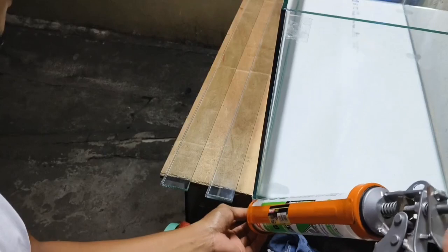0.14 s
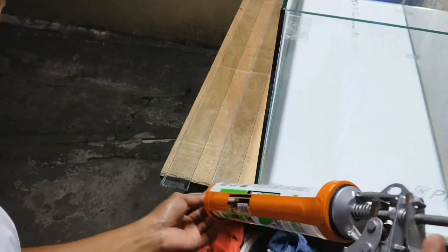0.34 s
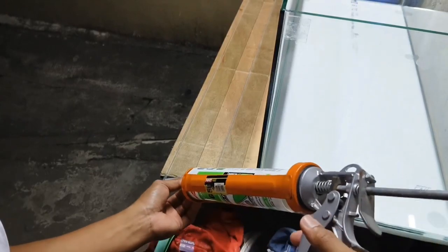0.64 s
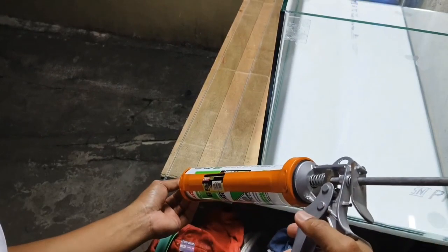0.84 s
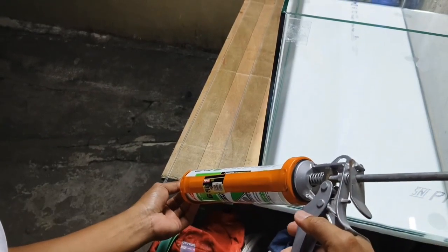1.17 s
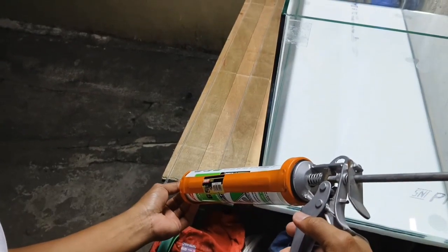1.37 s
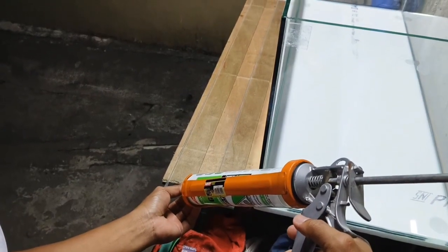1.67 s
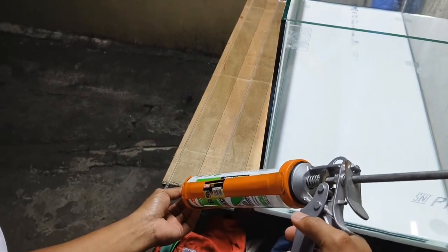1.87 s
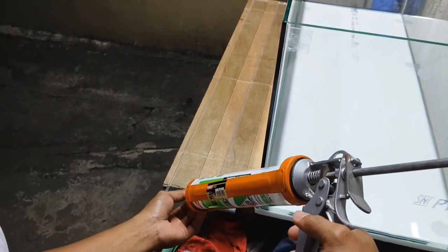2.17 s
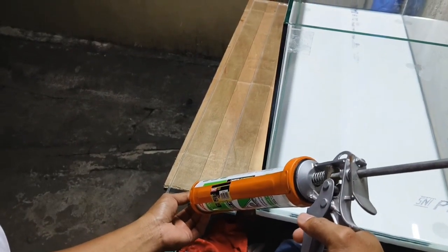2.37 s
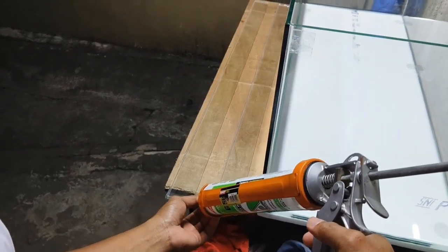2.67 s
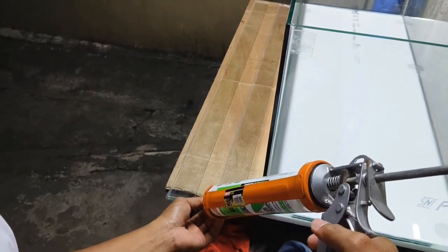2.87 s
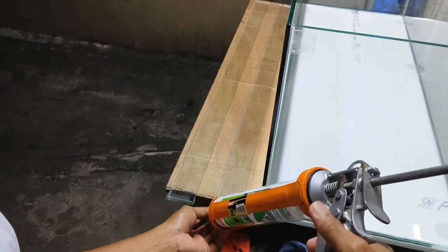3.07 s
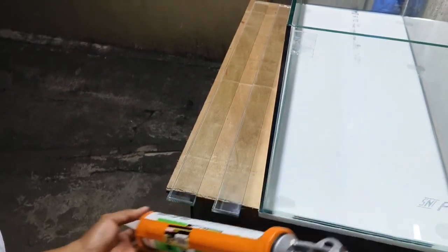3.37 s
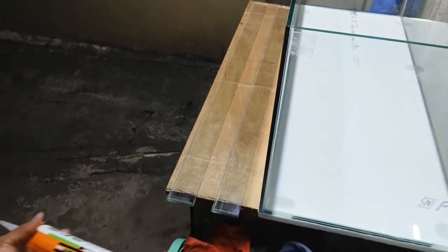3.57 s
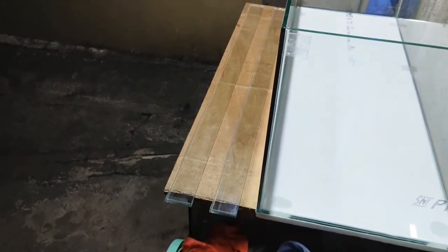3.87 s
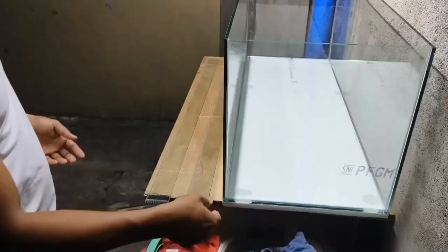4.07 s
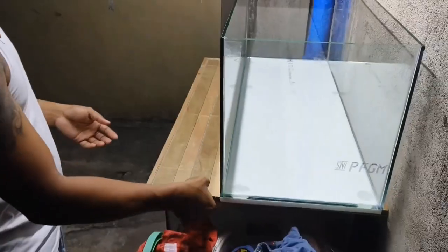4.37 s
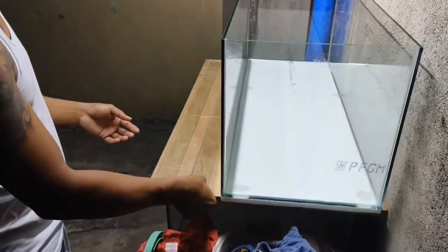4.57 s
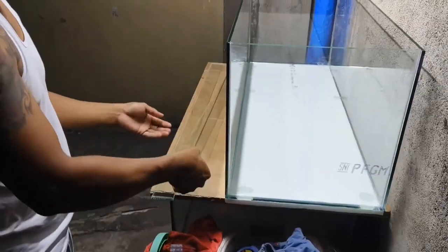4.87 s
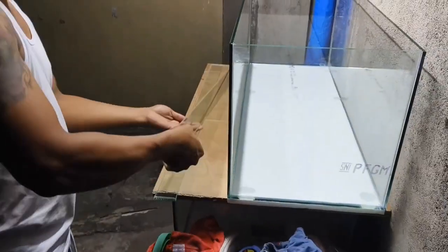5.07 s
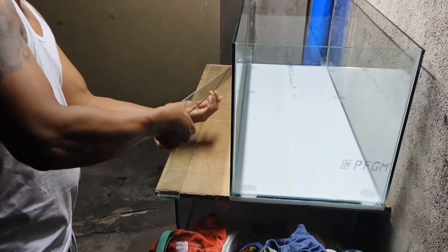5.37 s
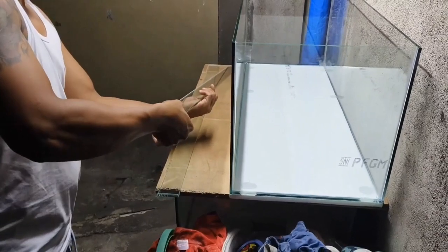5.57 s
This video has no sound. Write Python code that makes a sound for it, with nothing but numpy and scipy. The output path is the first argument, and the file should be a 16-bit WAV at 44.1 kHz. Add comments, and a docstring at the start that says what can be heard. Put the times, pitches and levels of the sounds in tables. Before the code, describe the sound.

Faint handling knocks lead to a hard double-edged metal snap with a short room ring. Small dry clicks and spring pings follow, separated by near quiet with faint rubbing and steady low hum. Another crisp snap, a brief clatter of putting down, then glass drags over wood with gritty scraping, low woody rumble and bright, damped clinks. Close microphone, short hard room reflections.

```python
"""In a small hard-walled workshop with a humming motor, a steel caulking gun is squeezed.
Its catch snaps, the spring and rod tick under load, the catch snaps free and the gun is put down.
Then a glass strip is slid off a wooden board and clinks against its neighbours.
Impacts are decaying clusters of modes, friction is a crowd of tiny ringing slips,
and the walls add a short noise-like tail."""
import sys
import numpy as np
from scipy import signal
from scipy.fft import rfft, irfft
from scipy.io import wavfile

SR = 44100
rng = np.random.default_rng(int(sys.argv[2]) if len(sys.argv) > 2 else 0)


def master_out(mix):
    """Clip the mix to full scale and print it as 16-bit PCM to the path in sys.argv[1]."""
    frames = np.transpose(np.atleast_2d(mix))
    ceiling = np.clip(frames, -1, 1)
    pcm = np.round(ceiling * 32767).astype(np.int16)
    wavfile.write(sys.argv[1], SR, pcm)


N = 252252   # samples

# Levels of events and curves are relative: each layer may add an offset of its own.
# catch snapping: (time [s], level [dB], treble [dB], left-right [dB], rattle t60 [s],
# rebound level [dB], room level [dB], room t60 [s])
SNAPS = [(0.2731, -9.5, -2.5, -2.5, 0.022, -0.5, -13, 0.17), (3.4094, -6, 3.5, -2, 0.012, -6, -13, 0.26)]
# spectrum of the glass strip: (frequency [Hz], level [dB per Hz])
GLASS = [(590, -98), (1000, -11), (1310, -43), (1710, -18.5), (2560, 1), (2940, -2.5), (3670, -8),
         (3980, -8), (7190, -6), (8260, -15), (9060, -10.5), (9830, -16), (12800, -12), (14900, -14.5),
         (16000, -26)]
# spectrum of the wooden board: (frequency [Hz], level [dB per Hz])
BOARD = [(220, -9), (320, -18), (410, 16), (520, -7), (800, -14.5), (1200, 0), (2000, -50)]
# phase by which the left microphone leads: (frequency [Hz], lead [rad])
LEAD = [(150, 0), (300, 1.4), (690, 2.8), (1500, 3.3), (3000, 5), (5000, 12.1), (16000, 38.8)]


def from_db(db):
    """Amplitude gain is ten to the power of a twentieth of the decibels."""
    return 10 ** (np.asarray(db) / 20)


def rms_one(x):
    """Normalise the mean power, so that the rms is 1."""
    return x / np.sqrt(np.mean(x ** 2) + 1e-20)


def at_hz(points, hz):
    """Interpolate a spectrum on a logarithmic frequency axis."""
    f, value = np.transpose(points)
    return np.interp(np.log(hz + 1), np.log(f), value)


def in_time(rows):
    """Interpolate each column of a time curve at every sample."""
    s, *columns = np.transpose(rows)
    return [np.interp(np.arange(N) / SR, s, c) for c in columns]


def drift(rate):
    """Random modulation: independent normal values, rate per second, joined by straight lines."""
    return np.interp(np.arange(N) / SR * rate, np.arange(4096), rng.standard_normal(4096))


def add(out, s, sound, pan_db=0):
    """Superpose a sound at a time, placed by the level difference between the microphones."""
    i = int(np.clip(s * SR, 0, out.shape[1] - 1))
    panned = sound * from_db([[pan_db / 2], [-pan_db / 2]])
    out[:, i:i + sound.shape[-1]] += panned[:, :out.shape[1] - i]


def coloured(white, db_at):
    """Spectral shaping and interchannel coherence: two unrelated signals become a pair of rms 1."""
    # correlation of the two microphones, limited below: (frequency [Hz], correlation [-])
    likeness = [(60, 8), (130, 0.9), (290, 3.5), (640, 0.61), (1400, 0.56), (3100, 0.35), (7000, 0.21)]
    # level difference of the microphones: (frequency [Hz], left-right [dB])
    balance = [(200, -2), (300, 12.5), (600, 0), (4500, 1), (6400, -8), (8200, -2.5), (10500, 9.5),
               (13000, 3)]
    hz = np.fft.rfftfreq(white.shape[1], 1 / SR)
    mid, side = rfft(white) * from_db(db_at(hz))
    alike = np.clip(at_hz(likeness, hz), -.99, .99)
    pair = np.sqrt(1 + alike) * mid + np.sqrt(1 - alike) * side * [[1], [-1]]
    pair[1] *= np.exp(-1j * np.interp(hz, *np.transpose(LEAD)))
    balanced = pair * from_db(at_hz(balance, hz) * np.array([[.5], [-.5]]))
    return rms_one(irfft(balanced, white.shape[1]))


def strike(db_at, t60, rise_s=0.0015, ripple_db=6.0, size=8192):
    """High modal density: a contact excites countless close modes unevenly; they decay together."""
    t = np.arange(size) / SR
    fade = from_db(-60 * t / max(t60, .004)) * (1 - np.exp(-t / rise_s))
    clusters = np.geomspace(1500, 16000, 60)
    favoured = ripple_db * rng.standard_normal(len(clusters))   # depends on the spot that is touched

    def rippled(hz):
        """Uneven excitation added to the mean spectrum."""
        return db_at(hz) + np.interp(hz, clusters, favoured)
    ring = coloured(rng.standard_normal((2, size)), rippled) * fade
    energy = np.mean(np.sum(ring ** 2, axis=1))
    return ring * np.sqrt(np.sum(fade ** 2) / energy)


def resonance(hz, centre_hz, q):
    """Response in dB of a single resonator of quality factor q."""
    ratio = (hz + 1) / centre_hz
    return -10 * np.log10(1 + (q * (ratio - 1 / ratio)) ** 2)


def treble(hz, edge_hz=8500):
    """Contact stiffness: a weight from 0 to 1 where a hard contact is brighter than a soft one."""
    return .5 + .5 * np.tanh((hz - edge_hz) / 1200)


def friction(spectrum, spread_db, cycles, count, size):
    """Micro-slip friction: uneven slips each ring one mode, which falls 60 dB in a few cycles."""
    when, pitch, strength, *phases = rng.random((5, count, 1))
    low_hz, high_hz = spectrum[0][0], spectrum[-1][0]
    hz = low_hz * (high_hz / low_hz) ** pitch
    gain = from_db(at_hz(spectrum, hz) - spread_db * np.log(strength + .03)) * hz
    turns = hz * np.arange(size) / SR
    fade = gain * np.exp(-np.log(1000) * turns / cycles) * np.minimum(turns, 1)
    at = ((when * N).astype(int) + np.arange(size)).ravel()
    channels = []
    for phase in phases:   # one set of phases for each microphone
        slips = fade * np.sin(2 * np.pi * (turns + phase))
        channels.append(np.bincount(at, slips.ravel(), N)[:N])
    return rms_one(np.array(channels))


def room(x, wet_db, t60=0.14, gap_s=0.0013, uneven_db=0.5, size=13230):
    """Reverberation: after a brief gap, wall echoes bunch up into a short, uneven decaying tail."""
    t = np.arange(size) / SR
    bunches = uneven_db * np.interp(t, np.linspace(0, t[-1], 120), rng.standard_normal(120))
    onset = np.clip(t / gap_s - .5, 0, 1)
    tail = rng.standard_normal((2, size)) * from_db(bunches - 60 * t / t60) * onset
    tail /= np.sqrt(np.sum(tail ** 2, axis=1, keepdims=True))
    return x + from_db(wet_db) * signal.oaconvolve(x, tail, axes=1)[:, :x.shape[1]]


def split_mode(hz, t, spread=.014, count=5):
    """Beating: loosely joined plates split a mode into close partners, unlike at each microphone."""
    jitter = rng.uniform(-1.05, 1, (count, 2, 1)) / count
    detune = np.linspace(-1, 1, count)[:, None, None] + jitter
    phase = rng.random(detune.shape)
    partners = np.sin(2 * np.pi * (hz * (1 + spread * detune) * t + phase)) / (1 + 2 * detune ** 2)
    return rms_one(np.sum(partners, axis=0)) / np.sqrt(2)


def one_mode(hz, t60, rise_s, size=4096):
    """A damped oscillator swells and dies; its phase lags at the right microphone."""
    t = np.arange(size) / SR
    lag = np.interp(hz, *np.transpose(LEAD)) * np.array([[0], [1]])
    return np.sin(2 * np.pi * hz * t - lag) * from_db(-60 * t / t60) * (1 - np.exp(-t / rise_s))


def workshop(waver_db=1.85, wander_rad=0.74, rumble_db=-56.0, air_db=-53.5, air_waver_db=1.87):
    """Tonal and broadband noise: a motor's wavering lines over low rumble and a wavering hiss."""
    # motor hum: (frequency [Hz], rms level before wavering [dB])
    hum_lines = [(60, -68), (120.2, -54), (149.2, -60), (241, -66.5), (360.7, -64), (480, -72.5),
                 (602, -72.5)]
    # spectrum of the rumble: (frequency [Hz], level [dB per Hz])
    rumble_spectrum = [(15, -51), (25, -25), (45, -32), (65, 3.5), (95, -0.5), (170, 3.5), (270, -8),
                       (450, -2), (750, -21), (1500, -34)]
    # spectrum of the hiss: (frequency [Hz], level [dB per Hz])
    air_spectrum = [(100, 1.5), (700, 6), (1200, 6), (2000, -3), (2800, 1), (3600, -5), (5500, -2.5),
                    (7200, 3), (8300, -21), (11000, -8), (15500, -5.5)]
    t = np.arange(N) / SR
    hum = 0
    for hz, db in hum_lines:
        gain = from_db(db + waver_db * drift(8.3)) * np.sqrt(2)
        hum = hum + gain * np.sin(2 * np.pi * (hz * t + rng.random()) + wander_rad * drift(4.3))
    rumble = coloured(rng.standard_normal((2, N)), lambda hz: at_hz(rumble_spectrum, hz))
    air = coloured(rng.standard_normal((2, N)), lambda hz: at_hz(air_spectrum, hz))
    return hum + from_db(rumble_db) * rumble + from_db(air_db + air_waver_db * drift(16)) * air


def rubbing(level_db=-5.5, waver_db=3, wavers_per_s=12.1):
    """Sliding friction: fine, wavering crackle of the rod creeping through its guide."""
    # rod and hand rubbing on the gun: (time [s], level [dB])
    rub_curve = [(0.0, -56), (0.33, -52.5), (0.46, -63), (0.95, -60.5), (1.14, -61), (2.65, -55),
                 (3.39, -60), (3.59, -54), (3.95, -49)]
    # spectrum of the rubbing: (frequency [Hz], level [dB per Hz])
    rub_spectrum = [(1000, -18), (2600, 3), (3600, -5), (5200, 6), (7000, -6), (8300, -4), (10500, -7.5),
                    (15500, -1.5)]
    rub_db, = in_time(rub_curve)
    crackle = friction(rub_spectrum, spread_db=5.0, cycles=24, count=4500, size=256)
    gain = from_db(rub_db + level_db + waver_db * drift(wavers_per_s))
    moving = np.arange(N) / SR < rub_curve[-1][0]
    return room(gain * crackle * moving, wet_db=4.5)


def sliding(board_db=-5.5, scrape_db=-2.0, catching_db=2.5, catches_per_s=77):
    """Friction between glass and wood: the board rumbles; the edge scrapes as it catches and lets go."""
    # glass dragged over the board: (time [s], board rumble level [dB], scrape level [dB])
    slide_curve = [(4.05, -80, -51), (4.12, -55, -60.5), (4.3, -58, -57), (4.346, -46, -55),
                   (4.394, -65, -47.5), (4.5, -54.5, -56), (4.6, -51, -54.5), (4.66, -54.5, -46),
                   (4.75, -66, -45.5), (4.86, -57, -55), (4.95, -62, -62.5), (5.28, -57, -58),
                   (5.5, -68, -57.5), (5.72, -52, -59)]
    rumble_db, edge_db = in_time(slide_curve)
    board = friction(BOARD, spread_db=2.0, cycles=11, count=1800, size=1400)
    edge = friction(GLASS, spread_db=5.5, cycles=26, count=4000, size=256)
    rumble = from_db(rumble_db + board_db) * board
    scrape = from_db(edge_db + scrape_db + catching_db * drift(catches_per_s)) * edge
    moving = np.arange(N) / SR > slide_curve[0][0]
    return room((rumble + scrape) * moving, wet_db=2.5)


def scuffs(per_s=1500, size=8192):
    """Resonant filtering of friction: a brief run of random slips swells and fades in one resonance."""
    # one part scuffing another: (time [s], length [s], level [dB], centre frequency [Hz], sharpness q [-])
    scuff_events = [(0.075, 0.045, -53, 4970, 2.5), (1.102, 0.011, -46.5, 4830, 2.4),
                    (2.265, 0.02, -50.5, 2300, 2.8), (3.328, 0.18, -48, 4900, 1.3),
                    (3.672, 0.025, -44.5, 2430, 0.81), (3.819, 0.088, -53, 3700, 0.34),
                    (4.325, 0.013, -39, 3930, 1.8), (4.347, 0.036, -53, 1490, 5.1),
                    (4.622, 0.051, -52, 2120, 1.4), (4.631, 0.038, -56.5, 950, 1.7),
                    (4.672, 0.027, -48, 6270, 1), (4.717, 0.035, -46.5, 4700, 0.89),
                    (5.105, 0.026, -47, 3560, 0.92), (5.314, 0.028, -51.5, 5860, 0.9),
                    (5.383, 0.031, -47.5, 3950, 1.3), (5.441, 0.031, -43, 2670, 5.6),
                    (5.61, 0.026, -56.5, 4000, 0.65)]
    out = np.zeros((2, N))
    for s, length, db, pitch_hz, q in scuff_events:
        slips = (rng.random(size) < per_s / SR) * rng.standard_normal((2, size))
        swell = np.sin(np.pi * np.minimum(np.arange(size) / SR / length, 1))
        grains = coloured(slips, lambda hz: 2 * resonance(hz, pitch_hz, q))
        add(out, s, from_db(db) * swell * grains)
    return room(out, wet_db=2.5)


def squeaks(rough=.025):
    """Stick-slip oscillation, fast enough to make an unsteady pitch."""
    # sticking parts: (time [s], length [s], frequency [Hz], glide [share], level [dB], octave level [dB])
    squeak_events = [(0.47, 0.048, 2164, -0.055, -58, -11), (0.722, 0.018, 2240, .01, -65, -24),
                     (2.269, 0.013, 1648, 0.04, -51.5, -23), (3.537, 0.024, 2213, -0.041, -50, -1)]
    out = np.zeros((2, N))
    for s, length, pitch_hz, glide, db, octave_db in squeak_events:
        along = np.linspace(0, 1, int(length * SR))
        hz = pitch_hz * (1 + glide * along + rough * drift(700)[:len(along)])
        phase = 2 * np.pi * np.cumsum(hz) / SR
        tone = np.sin(phase) + from_db(octave_db) * np.sin(2 * phase)
        add(out, s, from_db(db) * np.sin(np.pi * along ** 0.65) * tone * 2)
    return room(out, wet_db=1.0)


def knocks(level_db=3.5, thud_db=-30.5, thud_hz=292, thud_q=0.45, thud_t60=0.022):
    """Long contact time: soft knocks wake only low, damped modes; each snap also jolts the cartridge."""
    # hand, cartridge and board: (time [s], level [dB], centre frequency [Hz], sharpness q [-], t60 [s])
    knock_events = [(0.0305, -38, 880, 1.5, 0.017), (.038, -35, 486, 2.2, 0.039),
                    (0.05, -38.5, 477, 3.4, 0.072), (.2525, -43.5, 800, 0.83, 0.054),
                    (3.4019, -30, 1140, 0.23, 0.027), (3.6103, -44, 696, 1.6, 0.1),
                    (3.651, -39, 720, 1.4, 0.022), (3.669, -31, 715, 1.3, 0.033),
                    (3.679, -31, 730, 0.77, 0.027), (3.688, -37, 900, 1.1, 0.031),
                    (3.702, -42, 804, 1.7, 0.075), (4.092, -48.5, 373, 2.3, 0.15),
                    (4.159, -48, 358, 3.6, 0.078), (4.225, -50, 433, 4.3, 0.08),
                    (4.334, -42, 404, 12, 0.17), (4.352, -44.5, 416, 13, 0.16),
                    (4.425, -44.5, 428, 6.9, 0.13), (4.478, -39.5, 390, 11, 0.12),
                    (4.512, -42, 395, 6.4, 0.068), (4.57, -43, 390, 6, 0.1), (4.766, -50.5, 420, 7.4, 0.13),
                    (4.922, -49, 564, 8.2, 0.11), (5.07, -52, 400, 4.2, 0.28), (5.35, -53, 1070, 6.9, 0.13)]
    out = np.zeros((2, N))
    for s, db, pitch_hz, q, t60 in knock_events:
        knock = strike(lambda hz: 2 * resonance(hz, pitch_hz, q), t60, rise_s=0.00063)
        add(out, s, from_db(db + level_db) * knock)
    for s, db, *_ in SNAPS:
        thud = strike(lambda hz: 2 * resonance(hz, thud_hz, thud_q), thud_t60)
        add(out, s, from_db(db + thud_db + level_db) * thud)
    return room(out, wet_db=-4.0)


def rod(level_db=6.5, bright_db=8.5):
    """Impulsive excitation: short ticks, some brighter than others, as the loaded parts shift."""
    # rod, trigger and cartridge: (time [s], level [dB], treble [dB], left-right [dB])
    tick_events = [(0.106, -48.5, 13, 6), (0.192, -38, -2.5, -3), (0.407, -35.5, -20, -0.5),
                   (0.454, -35.5, -11, 7.5), (0.595, -49, 3, 2), (1.1153, -30, 10, -3),
                   (1.225, -52.5, -5, 3), (1.519, -44.5, 21, -2), (1.7955, -38.5, -10.5, -2),
                   (2.074, -42.5, 1, 7), (2.289, -46.5, -10, 1), (2.331, -39, -13, 1),
                   (2.431, -43.5, 10, 2), (2.51, -44.5, 3, 0), (2.685, -45, 9, 0), (2.762, -35.5, 18, 1.5),
                   (2.99, -47.5, 8, -2), (3.136, -39, -7, -1), (3.611, -39, -15, 3), (3.654, -43, -7, -4),
                   (3.709, -21.5, -10.5, 2), (3.838, -45, -27, -7)]
    # spectrum of a tick: (frequency [Hz], level [dB per Hz])
    tick_spectrum = [(200, -42), (1500, -37), (2700, -6), (3500, -8.5), (5200, 4), (7000, 8), (8500, -2.5),
                     (11000, -7.5), (16000, -6.5)]
    out = np.zeros((2, N))
    for s, db, treble_db, pan_db in tick_events:
        def colour(hz):
            """Tick spectrum with the treble set by the contact."""
            return at_hz(tick_spectrum, hz) + (treble_db + bright_db) * treble(hz)
        tick = strike(colour, t60=0.022, rise_s=0.0004)
        add(out, s - .001, from_db(db + level_db) * tick, pan_db)
    return room(out, wet_db=-3.0, gap_s=.005)


def spring(level_db=5.5, q=5.3):
    """Modal resonance: a slipping coil rings in one narrow, steep-sided cluster of modes."""
    # coils and small steel parts: (time [s], level [dB], centre frequency [Hz], left-right [dB])
    ping_events = [(0.195, -34, 5900, 5), (0.708, -44, 5200, -6), (.757, -34, 5750, 4),
                   (0.8595, -41.5, 5840, -2), (1.115, -32.5, 12000, 0), (1.3734, -22.5, 5000, 0.5),
                   (1.749, -33, 5720, 3), (2.1306, -38.5, 5760, -3), (2.5393, -41.5, 5540, -5),
                   (3.018, -38.5, 6570, 2), (3.0743, -25.5, 6000, 2), (3.611, -41, 2750, 0),
                   (3.652, -46.5, 2620, -5), (3.7095, -29, 2790, 2), (3.799, -34, 4500, 1.5)]
    out = np.zeros((2, N))
    for s, db, pitch_hz, pan_db in ping_events:
        ping = strike(lambda hz: 3 * resonance(hz, pitch_hz, q), t60=0.026, rise_s=0.0022)
        add(out, s - .0005, from_db(db + level_db) * ping, pan_db)
    return room(out, wet_db=-3.5, gap_s=.005)


def glass(level_db=-0.5, mode_db=6.5, body_db=6.5, bright_db=13.5, body_edge_hz=3500, board_db=-30.5):
    """Modal excitation: flat touches ring low modes, edge touches high ones; the board booms below."""
    # strips touching: (time [s], level [dB], body [dB], treble [dB], left-right [dB],
    # frequency of the mode struck hardest [Hz], level of that mode [dB])
    clink_events = [(4.0492, -36, -24, -22.5, 9, 4100, -34.5), (4.2493, -34.5, -33, -3, 0, 5100, -49),
                    (4.2757, -35, -32, -33, 6, 4340, -34), (4.3321, -17.5, -24, -16.5, -0.5, 3910, -26.5),
                    (4.425, -23, 1.5, -24, -0.5, 2510, -21), (4.5222, -22, -53, -15, -3.5, 6580, -27),
                    (4.566, -23.5, -62, -30, -2.5, 6000, -34), (4.624, -41, -15, -7, 6, 3000, -41),
                    (4.6936, -40, -1, 0, -1, 2454, -23.5), (4.7037, -26, -60, -12.5, -1, 7260, -33),
                    (4.724, -34, -15, -19, 1, 4860, -44), (4.764, -32, -8, -11, -7, 6930, -40),
                    (4.782, -36, -8, -18, -4, 7200, -41), (4.798, -30, -10, -30, 5.5, 2750, -27),
                    (4.8105, -26.5, -22, -22, -1, 5300, -39), (4.986, -39.5, -39, -29, 0, 2680, -62),
                    (5.015, -34, -43, -2, 2, 5200, -53), (5.0612, -35.5, -18, -15, 0, 4750, -40),
                    (5.117, -37, -1, -15, 4, 3070, -42), (5.13, -28, -12, -7, 5, 5200, -38),
                    (5.1403, -26.5, -41, -8.5, -2, 5100, -36.5), (5.2124, -30.5, -29, -16.5, 1, 4900, -52),
                    (5.31, -46, -1, -22, 4, 2600, -55), (5.393, -43, -12, -8, 10, 2900, -44),
                    (5.402, -37.5, -1, -13, 1, 4820, -35), (5.453, -33, -19, -14, -3, 2600, -50),
                    (5.4584, -26.5, -21, -22, 2, 2620, -43), (5.469, -32, -14, -12, 4, 5100, -37),
                    (5.706, -45, -2, -19, 6, 3200, -45)]
    out, near = np.zeros((2, 2, N))
    for s, db, low_db, treble_db, pan_db, ring_hz, ring_db in clink_events:
        def colour(hz):
            """Glass spectrum with body and treble set by the contact."""
            body = (low_db + body_db) / (1 + (hz / body_edge_hz) ** 10)
            return at_hz(GLASS, hz) + body + (treble_db + bright_db) * treble(hz)
        clink = strike(colour, t60=0.034, rise_s=0.002, ripple_db=3.0)
        add(out, s - .0005, from_db(db + level_db) * clink, pan_db)
        mode = one_mode(ring_hz, t60=0.016, rise_s=0.0008)   # damped by the hand
        add(near, s, from_db(ring_db + mode_db) * mode, pan_db)
        boom = strike(lambda hz: at_hz(BOARD, hz) + resonance(hz, centre_hz=580, q=1.0), t60=0.29)
        add(out, s, from_db(db + board_db) * boom)
    clinks = room(out, wet_db=-4.0, t60=0.22, gap_s=0.0023, uneven_db=3.5)
    return clinks + room(near, wet_db=-7.0, gap_s=0.0068)


def catch(modes_db=-10.5, rebound_s=0.003, build_up_s=0.00066, walls_treble_db=-2.5,
          walls_rise_s=0.0073, bunch_db=1, bunches_per_s=300, clamp_db=7.5, clamp_t60=0.055):
    """Impact and modal decay: the sprung plate hits the frame, rebounds once; frame and walls ring on."""
    # dense ring of the frame: (frequency [Hz], level [dB per Hz])
    frame_spectrum = [(150, -20), (550, -34), (1000, -19.5), (1500, -11), (1850, 0.5), (2180, -9),
                      (2550, 3.5), (3400, -0.5), (4600, 2.5), (5600, 2), (6300, 4.5), (7300, -2.5),
                      (9000, -3.5), (11000, -1.5), (13500, 0.5), (15200, -4), (16000, -12.5)]
    # clearest modes: (frequency [Hz], t60 [s], level at first snap [dB], level at second snap [dB])
    frame_modes = [(770, 0.35, -38, -31.5), (1850, 0.2, -19, -22.5), (2516, 0.25, -21, -17),
                   (4070, 0.28, -28, -23.5), (4350, 0.16, -10, -24), (4860, 0.12, -11, -31),
                   (6110, 0.18, -17.5, -13), (6320, 0.24, -13, -21.5)]
    out = np.zeros((2, N))
    for k, (s, db, treble_db, pan_db, t60, rebound_db, wet_db, room_t60) in enumerate(SNAPS):
        def colour(hz):
            """Frame spectrum, brighter for a harder blow."""
            return at_hz(frame_spectrum, hz) + treble_db * treble(hz, edge_hz=7300)

        def walls_colour(hz):
            """Frame spectrum with the treble dulled by the walls."""
            return colour(hz) + walls_treble_db * treble(hz)
        crack = strike(colour, t60, rise_s=0.00026, ripple_db=2.0)
        rebound = strike(colour, t60, rise_s=0.00084, ripple_db=2.0)
        add(crack, rebound_s, from_db(rebound_db) * rebound)

        wash = strike(walls_colour, room_t60, walls_rise_s, ripple_db=2.5, size=16384)
        t = np.arange(wash.shape[1]) / SR
        bunches = bunch_db * drift(bunches_per_s)[:len(t)]   # echoes arrive in uneven bunches
        wash = wash * from_db(wet_db + bunches)

        ring = 0
        for hz, mode_t60, *mode_db in frame_modes:
            ring = ring + from_db(mode_db[k] - 60 * t / mode_t60) * split_mode(hz, t)
        # most of the ring dies while the plate still presses on the frame
        clamped = 1 + from_db(clamp_db - 60 * t / clamp_t60)
        ring = ring * np.minimum(t / build_up_s, 1) * clamped
        add(out, s, from_db(db) * crack, pan_db)
        add(out, s, from_db(db) * (wash + from_db(modes_db) * ring), pan_db)
    return out


def gain_control(x, threshold_db=-28.0, window_s=0.11, attack_s=0.028, release_db_per_s=7.0):
    """Dynamic compression: a loud, bright sound turns the gain down; it creeps back steadily."""
    power = np.cumsum(np.mean(np.diff(x, prepend=0) ** 2, axis=0))   # differencing favours treble
    lag = int(window_s * SR)
    windowed = power - np.pad(power, (lag, 0))[:N]
    level_db = 10 * np.log10(np.maximum(windowed, 1e-12) / lag)
    slope = release_db_per_s * np.arange(N) / SR
    excess_db = np.maximum(level_db - threshold_db, 0)
    cut_db = np.maximum.accumulate(excess_db + slope) - slope   # falls no faster than the release
    keep = np.exp(-1 / (attack_s * SR))
    return x * from_db(-signal.lfilter([1 - keep], [1, -keep], cut_db))


def scene():
    """Superposition of workshop, glass and gun."""
    gun = catch() + spring() + rod() + squeaks() + rubbing()
    return gun + knocks() + scuffs() + glass() + sliding() + workshop()


def record(dry, ceiling=.9, cutoff_hz=15700):
    """Compression, saturation and low-pass: gain ducks, sharp peaks are rounded, the top is cut steeply."""
    held = gain_control(dry)
    rounded = held / (1 + (held / ceiling) ** 4) ** (1 / 4)
    low_pass = signal.ellip(12, .1, 90, cutoff_hz, fs=SR, output="sos")
    return signal.sosfilt(low_pass, rounded)


dry = scene()
out = record(dry)
master_out(out)
```